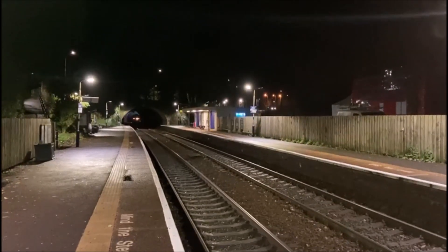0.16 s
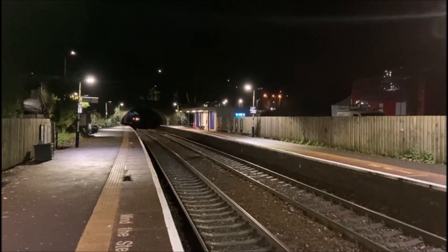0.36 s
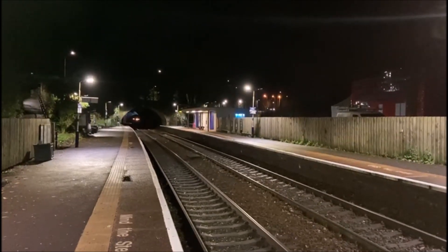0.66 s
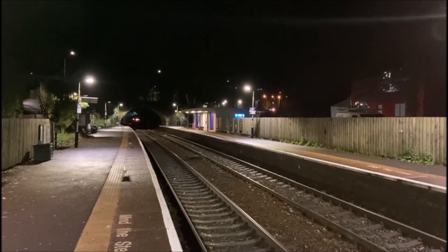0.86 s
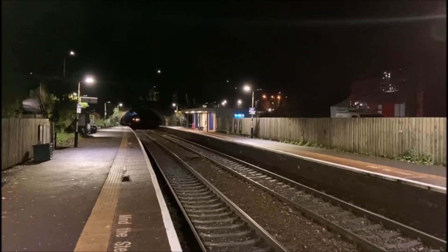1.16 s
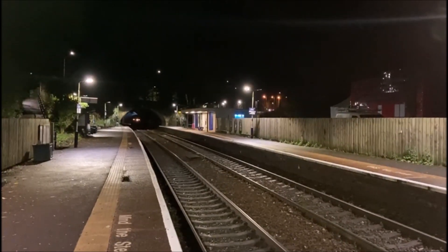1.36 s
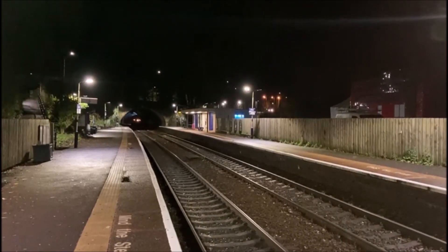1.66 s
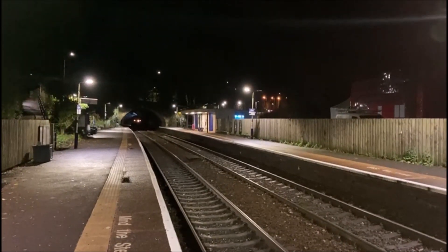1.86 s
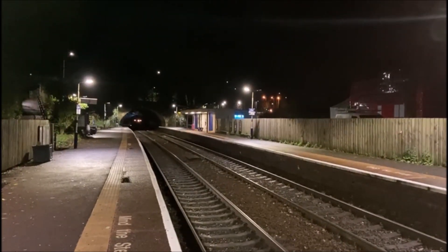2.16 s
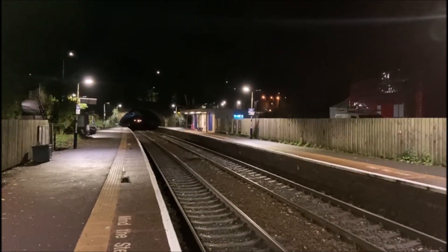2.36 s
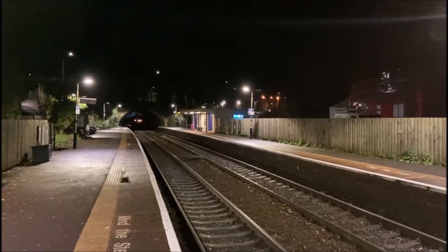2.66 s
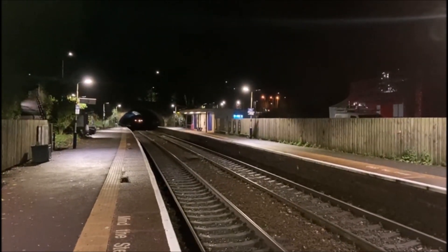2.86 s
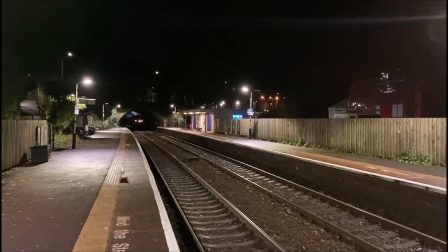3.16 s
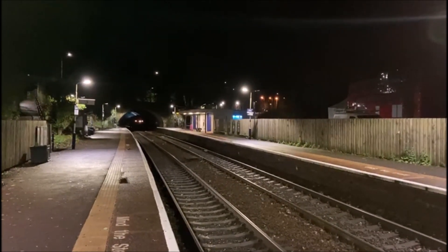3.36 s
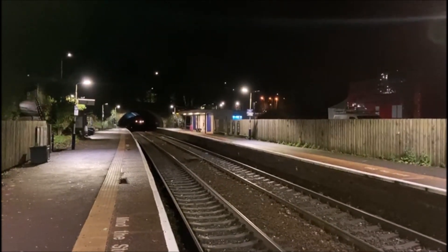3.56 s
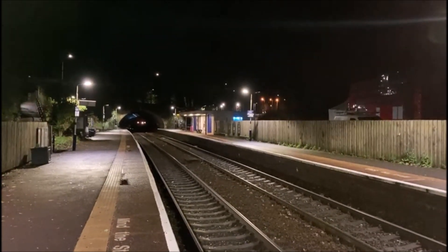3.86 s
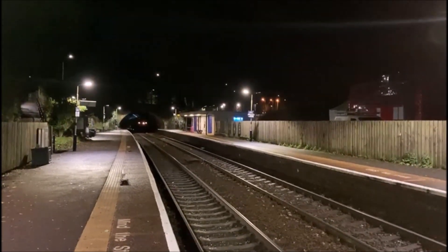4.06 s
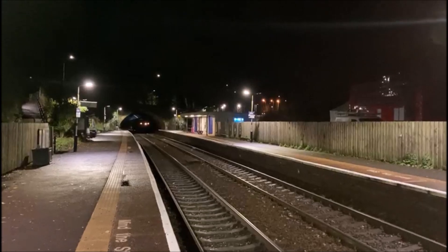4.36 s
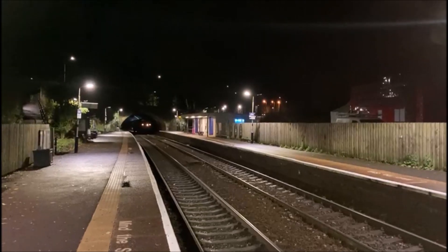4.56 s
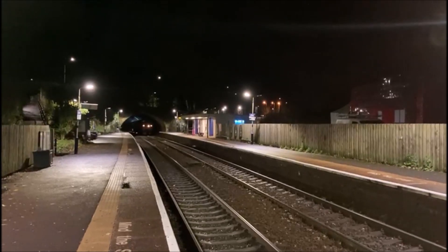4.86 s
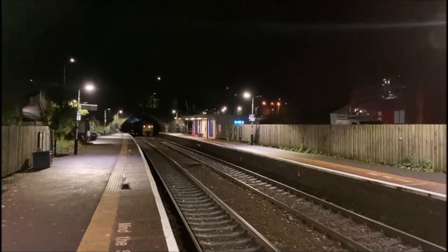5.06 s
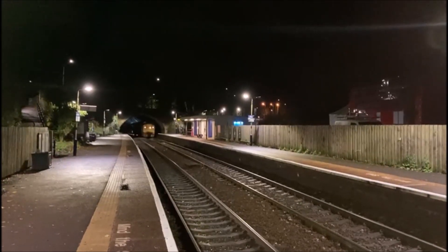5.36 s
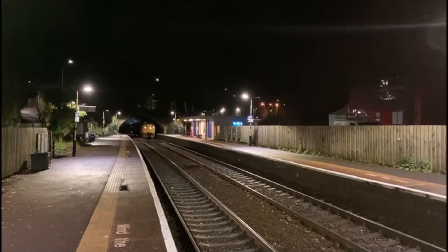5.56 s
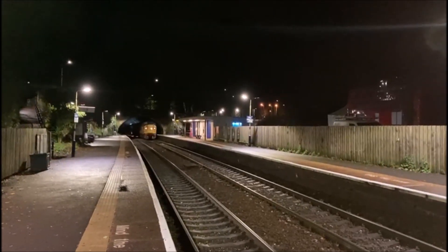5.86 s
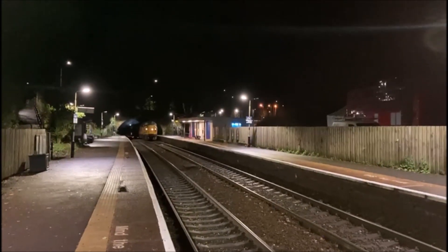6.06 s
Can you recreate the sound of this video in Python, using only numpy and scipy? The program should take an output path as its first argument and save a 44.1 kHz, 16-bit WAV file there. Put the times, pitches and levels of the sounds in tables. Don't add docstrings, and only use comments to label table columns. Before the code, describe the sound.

A train horn flutters low, cracks into a piercing squeal and echoes away, then a diesel locomotive's beating rumble and rising turbo whistle draw nearer.

```python
import sys
import numpy as np
from scipy import signal
from scipy.fft import rfft, irfft, next_fast_len
from scipy.io import wavfile
from scipy.ndimage import uniform_filter1d, map_coordinates

SR = 44100
rng = np.random.default_rng(int(sys.argv[2]) if len(sys.argv) > 2 else 0)


def magnitude_from_level(level_db):
    exponent = np.asarray(level_db, float) / 20
    return 10 ** exponent


def persist_wave(psi):
    counts = np.round(np.clip(psi, -1, 1) * 32767).astype(np.int16)
    wavfile.write(sys.argv[1], SR, np.atleast_2d(counts).T)


N = 274743
T = np.arange(N) / SR
SIZE = next_fast_len(N + SR)
HZ = np.arange(SIZE // 2 + 1) * SR / SIZE
CRACK_S = 0.4427
RELEASE_DB_S = 858


def columns(table, x=T):
    s, *cols = np.transpose(table)
    return [np.interp(x, s, c) for c in cols]


def unit(x):
    return x / np.sqrt(np.mean(x ** 2))


def shaped(x, gain):
    return irfft(rfft(x, SIZE) * gain, SIZE)[..., :N]


def turns(hz):
    return 2 * np.pi * np.cumsum(hz) / SR


def walk(rate):
    hold = int(SR / rate)
    steps = np.repeat(rng.standard_normal(N // hold + 1), hold)
    return 1.443 * uniform_filter1d(uniform_filter1d(steps, hold), hold)[:N]


def tail(x, t60):
    burst = rng.standard_normal(SR) * np.exp(-np.log(1000) * T[:SR] / t60)
    return shaped(x, rfft(burst / np.sqrt(np.sum(burst ** 2)), SIZE))


def fades(table):
    return sum(db * np.exp(-((T - s) / span) ** 2) for s, db, span in table)


def ticks():
    # t/s, peak level/dB
    joints = [
        (4.328, -50),
        (4.439, -44),
        (5.624, -32),
    ]
    hits = np.zeros(N)
    for s, db in joints:
        hits[int(s * SR)] = magnitude_from_level(db + 28.5)
    return shaped(tail(hits, .06), (HZ / 7000) ** 2 / (1 + (HZ / 7000) ** 2))


def puffs(cycle, width):
    cylinders = [3, -1, 3, 3, 8, -10, 3.5, -6, 7.5, -6.5, 4, -13.5]
    firing = cycle / (2 * np.pi) * len(cylinders)
    k = firing.astype(int)
    uneven_db = 1.8 * rng.standard_normal(k[-1] + 1)[k]
    size = magnitude_from_level(np.array(cylinders)[k % len(cylinders)] + uneven_db)
    return unit(uniform_filter1d(size * np.exp(-(firing - k) / width), size=300))


def gas(cycle, range_db):
    # f/Hz, level per Hz/dB
    gas_levels = [(30, -24), (50, -10.5), (100, -20), (200, -20.5), (290, -29), (420, -24), (700, -31.5),
                  (1000, -33), (1500, -37), (2100, -33), (3200, -32), (5000, -43), (7000, -48.5),
                  (11000, -60.5)]
    gas_hz, gas_db = np.transpose(gas_levels)
    out, swell, gate = 0, walk(3.05), puffs(cycle, 0.69)
    for hz in 32 * 2 ** np.arange(0, 8.7, 1 / 3):
        thirds_away = np.clip(3 * np.log2(HZ / hz + 1e-9), -1, 1)
        band = shaped(rng.standard_normal(N), np.cos(np.pi / 2 * thirds_away))
        place = np.interp(np.log(hz), np.log([200, 400, 800, 1300, 2200]), [0, 1, 2, 2, 3])
        level = sum(np.clip(1 - abs(place - j), 0, 1) * db for j, db in enumerate(range_db))
        level = level + np.interp(np.log(hz), np.log(gas_hz), gas_db) + 0.93 * swell + 1.75 * walk(8.0)
        share = np.interp(np.log(hz), np.log([100, 400, 5000]), [.1, .33, .33])
        out = out + band * magnitude_from_level(level) * (1 - share + share * gate)
    return out * np.sqrt(SR / 2), gate


def exhaust(cycle, near_db, rumble_db):
    # order of the cycle, level over the rumble/dB
    order_lines = [(6, -18.5), (7, -10.5), (8, -10), (10, -3.5), (11, -5), (13, -7), (14, -11), (15, -17),
                   (16, -19.5), (18, -6.5), (19, -12.5), (21, -9.5), (22, -9), (23, -10), (25, -8.5),
                   (28, -6.5), (31.5, -6)]
    # t/s, depth/dB, half width/s
    ninth_fades = [
        (1.2, 10, .3),
        (2.6, 2.5, 0.05),
        (3.75, 4.5, 0.2),
        (4.8, 24, 0.1),
        (5.06, 10, 0.043),
        (5.87, 13, 0.17),
        (6.2, 1.5, 0.13),
    ]
    # t/s, depth/dB, half width/s
    twelfth_fades = [
        (1.15, 3.8, 0.16),
        (2.6, 1.5, 0.071),
        (3.5, 11, 0.49),
        (5.15, 14, 0.24),
    ]
    ninth_db = -15.5 + 0.8 * near_db - fades(ninth_fades) + 1.3 * walk(5.4)
    twelfth_db = -18.5 + 0.66 * near_db - fades(twelfth_fades) + 1.3 * walk(8.3)
    out = magnitude_from_level(ninth_db) * np.sin(9 * cycle) + magnitude_from_level(twelfth_db) * np.sin(12 * cycle + 1)
    for order, db in order_lines:
        drift = 0.9 * walk(3.5) + 2 * np.pi * rng.random()
        out = out + magnitude_from_level(rumble_db + db + 2.25 * walk(3.0)) * np.sin(order * cycle + drift)
    return np.sqrt(2) * out


def gear_whine(cycle):
    swell_s, span_s, fall_db = 4.0, .9, 4
    gear_db = -32 - fall_db * ((T - swell_s) / span_s) ** 2
    whine = np.sin(63 * cycle + .8 * walk(16))
    return np.sqrt(2) * magnitude_from_level(gear_db + 2.3 * walk(7.6)) * whine


def turbo(hz, db, gate, width_hz=330):
    widths = (width_hz, width_hz, 1500, 1500)
    slow = [unit(shaped(rng.standard_normal(N), 1 / (1 + (HZ / w) ** 4))) for w in widths]
    top, skirt = turns(hz), turns(hz - 1400)
    core = slow[0] * np.cos(top) + slow[1] * np.sin(top)
    breath = slow[2] * np.cos(skirt) + slow[3] * np.sin(skirt)
    return magnitude_from_level(db + 2 * walk(9.0)) * (core + magnitude_from_level(-4.5) * breath) * (0.52 + 0.48 * gate)


def locomotive():
    # t/s, engine cycle rate/Hz
    crank = [
        (0.0, 5.9),
        (1.0, 5.94),
        (2.0, 6.44),
        (3.0, 7.19),
        (4.2, 7.04),
        (5.0, 7.26),
        (6.23, 7.73),
    ]
    # t/s, nearness/dB, turbocharger f/Hz
    approach = [(0, -19, 5700), (.9, -17, 6090), (1.6, -19.5, 6500), (2.4, -16.5, 7050), (3.0, -14.5, 7500),
                (3.6, -10.5, 7915), (4.2, -6, 8030), (4.8, -3.5, 8140), (5.5, -1.5, 8430), (5.9, -3, 8630),
                (6.23, -4, 8340)]
    # level when nearest/dB, gain per dB of nearness/dB, lateness/s
    ranges = [
        (-23.5, 0.8967, 0.38),
        (-19, 1.0533, -0.46),
        (-20.5, 1.0, -0.046),
        (-32.5, 1.05, 0.18),
    ]
    cycle = turns(columns(crank)[0])
    near_db, turbo_hz = columns(approach)
    range_db = [db + growth * np.interp(T - late, T, near_db) for db, growth, late in ranges]
    roar, gate = gas(cycle, range_db)
    beat = exhaust(cycle, near_db, range_db[0]) + gear_whine(cycle)
    return beat + roar + turbo(turbo_hz, -39.5 + 1.41 * near_db, gate)


def valve(start, length, db, sag_db=0.):
    attack_s = 0.041
    t = np.clip(T - start, 0, None)
    level = db - sag_db * t - RELEASE_DB_S * np.clip(t - length, 0, .3)
    return (1 - np.exp(-t / attack_s)) * magnitude_from_level(level)


def low_note():
    # start/s, length/s, f/Hz, level/dB, sag per s/dB
    low_notes = [
        (0.041, 0.3967, 385, -17, 3.5),
        (.578, .14, 382, -17, 113),
    ]
    # harmonic, level/dB, flutter sideband/dB
    low_tones = [(1, 2, -19), (2, -9.5, -3), (3, -45, 0), (4, -29.5, -1), (5, -25, 2), (6, -31, 1.5),
                 (7, -39, 3), (8, -39, -3), (9, -46, -0.5)]
    first, again = low_notes
    size = sum(valve(s, length, db, sag_db) for s, length, _, db, sag_db in low_notes)
    phase = turns(np.where(T < again[0], first[2], again[2]) + 0.79 * walk(20.0))
    flutter = turns(17 + 30 * T)
    near = np.clip((.55 - T) / .05, .25, 1)
    low = 0
    for k, tone_db, side_db in low_tones:
        pair = np.sin(k * phase + 0.17 * k * walk(60.0)) + magnitude_from_level(side_db) * np.sin(k * phase - flutter)
        level = magnitude_from_level(tone_db + (.5 + 0.32 * k) * walk(45.0))
        low = low + size * level * pair * (near if k > 1 else 1)
    return low


def high_squeal():
    # t/s, f/Hz, level/dB
    high_mode = [
        (.04, 876, -40.5),
        (.06, 869, -35.5),
        (.13, 867, -49),
        (.31, 873, -33),
        (.435, 849, -16),
        (.455, 885, -14.5),
        (.492, 885.2, -19),
        (.522, 873.6, -26.5),
        (.545, 870, -29.5),
    ]
    # harmonic, level over the third/dB
    high_tops = [(4, -11.5), (5, -17), (6, -21.5), (7, -25.5), (8, -45), (9, -45)]
    crack_rise_s, veil_db, second_db, third_db = 0.0043, 16.5, 1.4, -6.5
    hz, db = columns(high_mode)
    db = db - RELEASE_DB_S * np.clip(T - high_mode[-1][0], 0, .3)
    phase = turns(hz)
    open_db = db - veil_db * np.clip((CRACK_S - T) / crack_rise_s, 0, 1)
    tones = [(1, db), (2, open_db + second_db), (3, open_db + third_db)]
    tones += [(k, open_db + third_db + top_db) for k, top_db in high_tops]
    return sum(magnitude_from_level(d + .6 * walk(40.2)) * np.sin(k * phase + 1.0 * k) for k, d in tones)


def horn():
    # f/Hz, level/dB, t60/s
    fading_tones = [
        (282, -33, 0.84),
        (563, -31, 0.29),
    ]
    low, high = low_note(), high_squeal()
    mixed = shaped(low * high, magnitude_from_level(10.5) * (HZ / 1000) ** 1.17 / (1 + (HZ / 5000) ** 2))
    fading = 0
    for hz, db, t60 in fading_tones:
        fading = fading + magnitude_from_level(db) * np.exp(-np.log(1000) * T / t60) * np.sin(2 * np.pi * hz * T)
    burst = magnitude_from_level(-31) * np.exp(-((T - CRACK_S + 0.0034) / 0.011) ** 2)
    flow = valve(0.01, 0.508, -40) + burst
    air = flow * unit(shaped(rng.standard_normal(N), HZ / 1800 / (1 + (HZ / 1800) ** 2.1)))
    return np.sqrt(2) * (low + high + mixed + fading) + air, np.sqrt(2) * high


def squeal_echoes(squeal):
    returns = [(.23, -15.5), (.31, -23), (.36, -16), (.6, -23.5)]
    walls = sum(magnitude_from_level(db) * np.exp(-2j * np.pi * HZ * s) for s, db in returns)
    wall = magnitude_from_level(1 * walk(20.6)) * shaped(squeal, walls / (1 + (HZ / 1100) ** 2))
    bright = shaped(squeal, 1 + (HZ / 2500) ** 2.6)
    return wall + magnitude_from_level(-15 + 5.4 * walk(20.3)) * tail(bright, 1.1)


def duck_db():
    horn_db, squeal_db = -2.5, -14.5
    times = CRACK_S + np.cumsum([0, 0.072, 0.17, 0.1])
    return np.interp(T, times, [horn_db, squeal_db, squeal_db + 3.5, 0])


def ports(x):
    # f/Hz, right lag behind left/turns, late path left/dB, late path right/dB, diffuse/dB
    port_paths = [(0, 0, -12.5, -24, -54), (317, 0, -55, -58, -8), (623, 0.01, -22, -2, -20),
                  (1120, 0, -7, 3.5, 0), (2050, 0.33, -20.5, 11.5, -9), (2770, 0.28, 4, 2.5, -15),
                  (4030, 0.554, -47, 0, -13), (5140, 0.515, -22.5, -17, -8), (6520, 1, -43, -22.5, -6.5),
                  (7200, 1, -20, -32.5, -21), (7270, 0.92, -23.5, -25, -11.5), (8676, .5, -15, -17, -17),
                  (9450, .5, -29, -39.5, -20), (10600, 0.8, -31.5, -41, -32.5)]
    late_s, late_shift_hz = .0024, 150
    lag, left_db, right_db, wet_db = columns(port_paths, HZ)
    late = np.exp(-2j * np.pi * (HZ - late_shift_hz) * late_s)
    behind = np.exp(-2j * np.pi * lag)
    stirred = map_coordinates(x, [np.arange(N) - 13 * walk(4)], order=3)
    direct = rfft(x, SIZE)
    wet = rfft(tail(stirred, 0.072), SIZE) * magnitude_from_level(wet_db)
    left = direct * (1 + magnitude_from_level(left_db) * late) / np.sqrt(1 + magnitude_from_level(2 * left_db)) + wet
    right = direct * (behind + magnitude_from_level(right_db) * late) / np.sqrt(1 + magnitude_from_level(2 * right_db)) - wet * behind
    return irfft([left, right], SIZE)[:, :N]


def scene():
    engine = locomotive()
    blast, squeal = horn()
    return ports(magnitude_from_level(duck_db()) * (engine + squeal_echoes(squeal)) + blast + ticks())


def low_pass(x):
    return signal.sosfilt(signal.butter(12, 12300, fs=SR, output="sos"), x)


def record(dry):
    soft = np.tanh(.45 * dry) / .45
    mix = shaped(soft, 1 / (1 + (HZ / 11600) ** 80))
    return low_pass(mix)


dry = scene()
out = record(dry)
persist_wave(out)
```